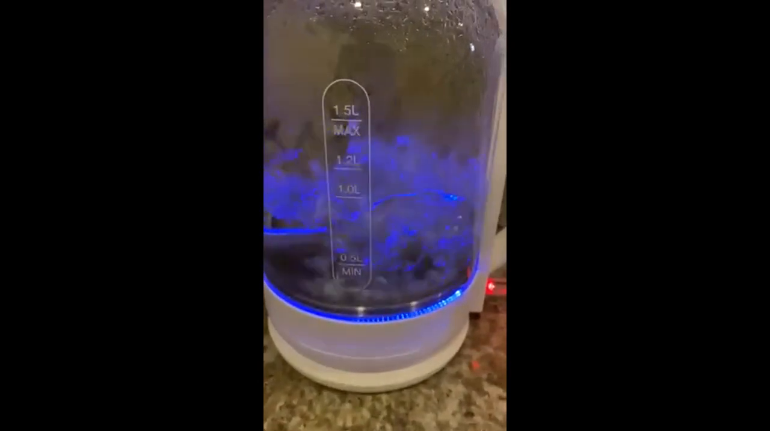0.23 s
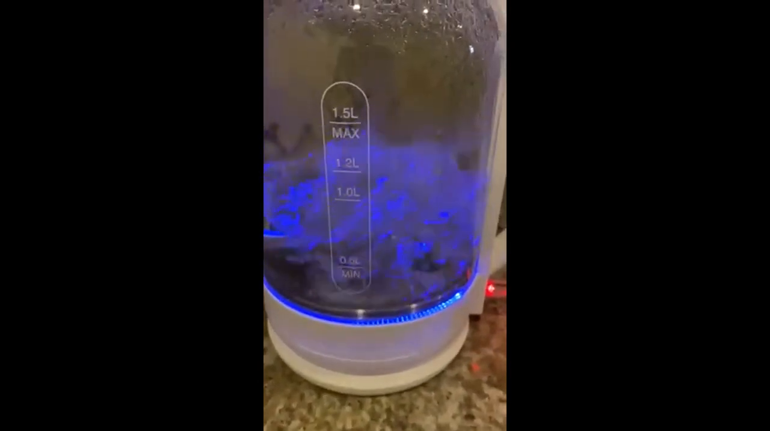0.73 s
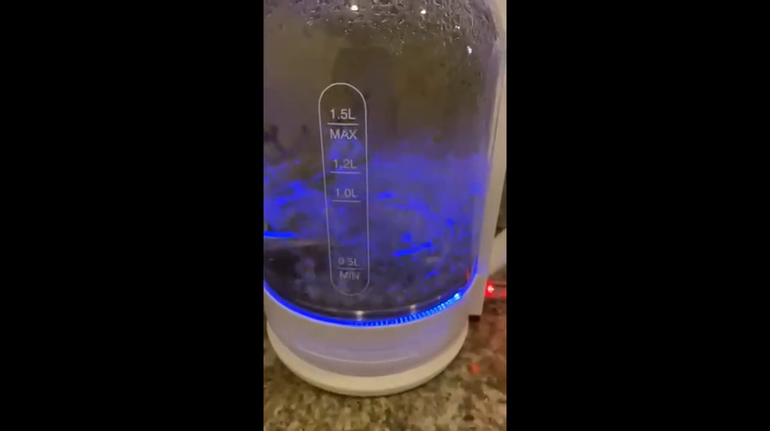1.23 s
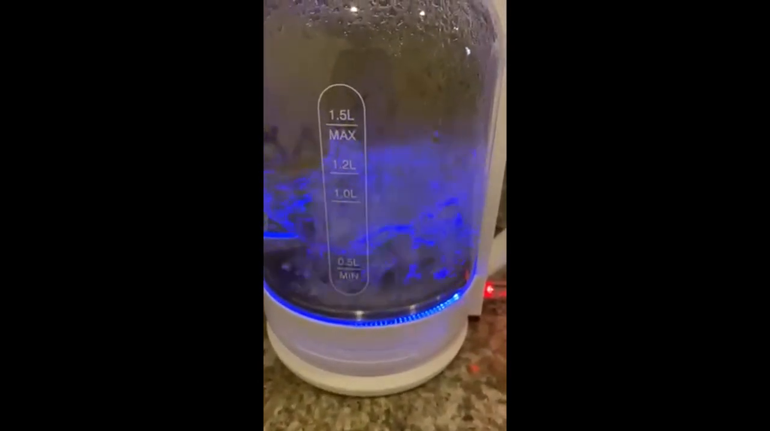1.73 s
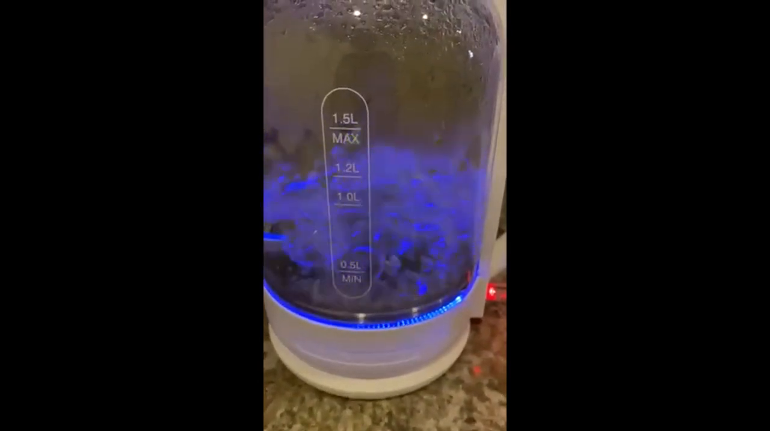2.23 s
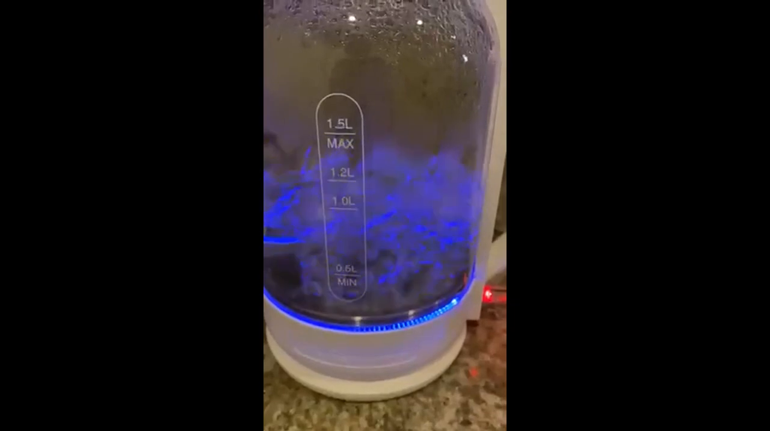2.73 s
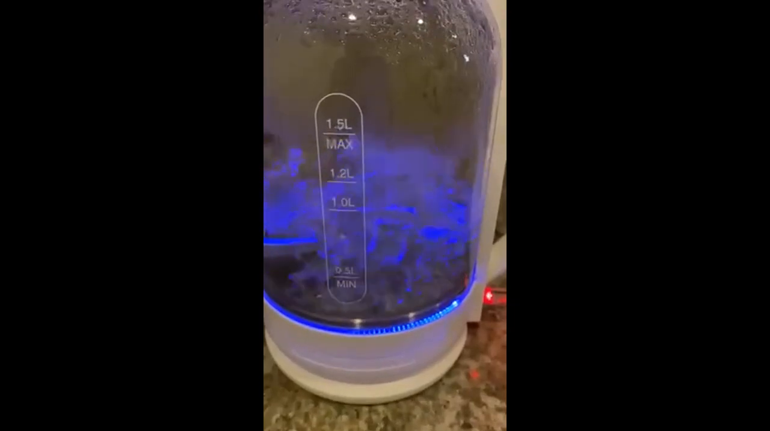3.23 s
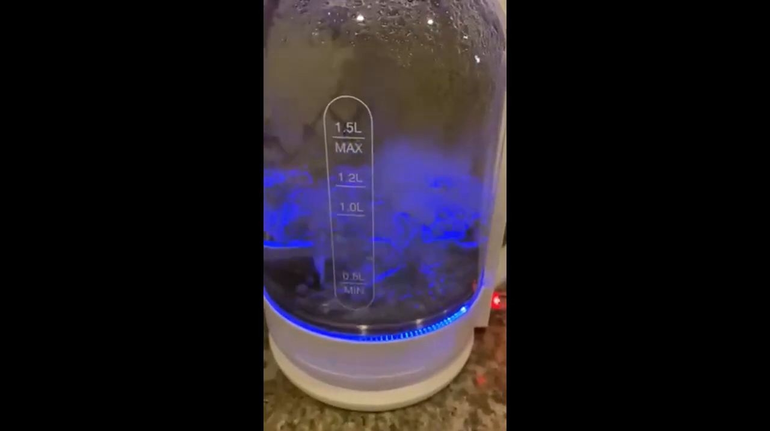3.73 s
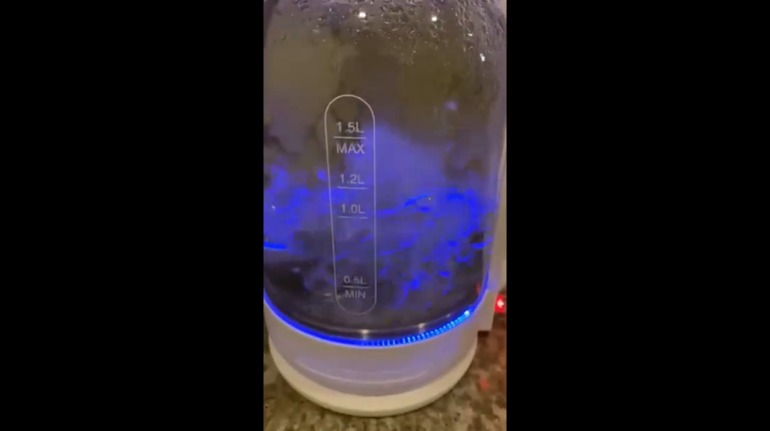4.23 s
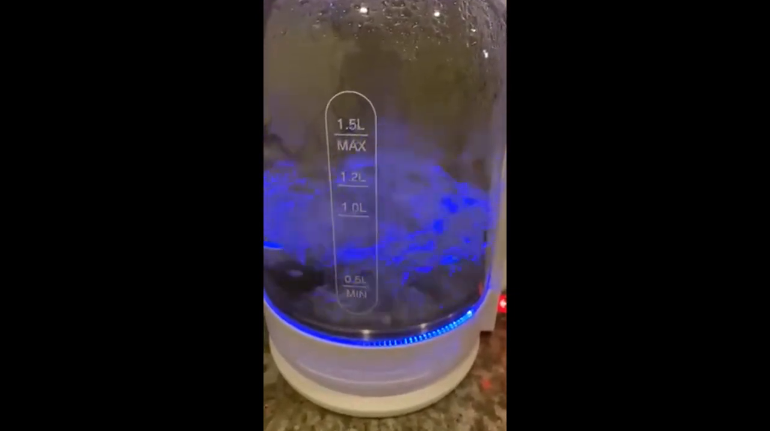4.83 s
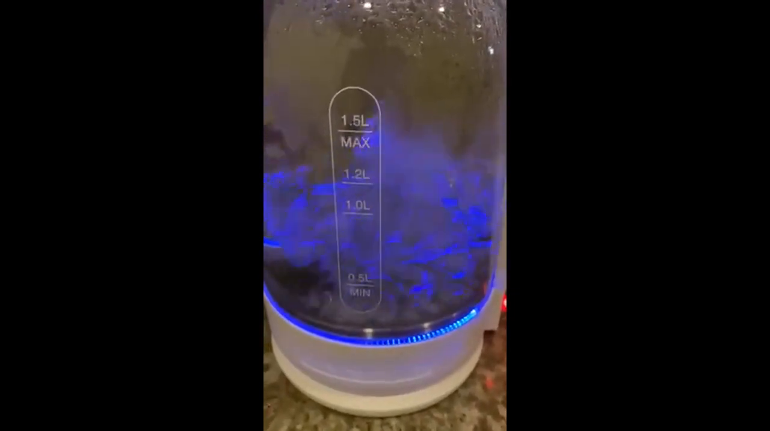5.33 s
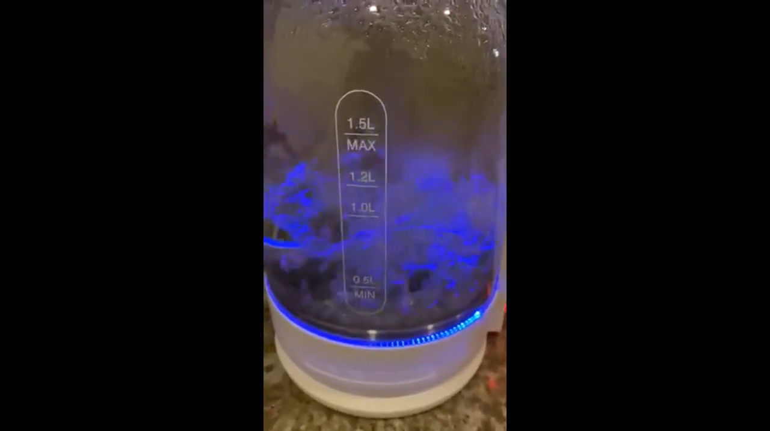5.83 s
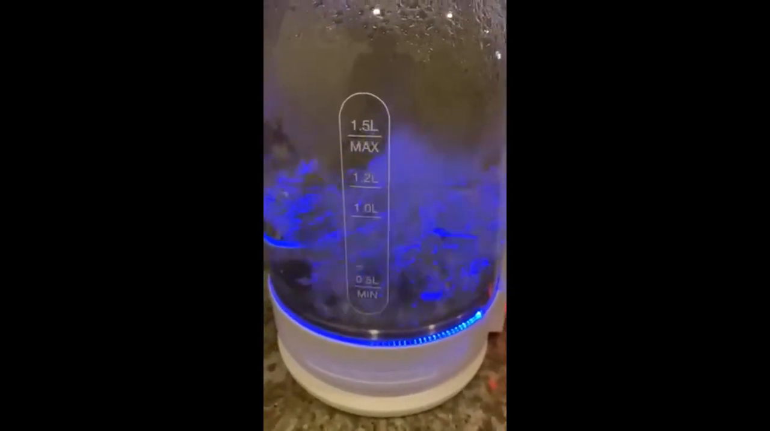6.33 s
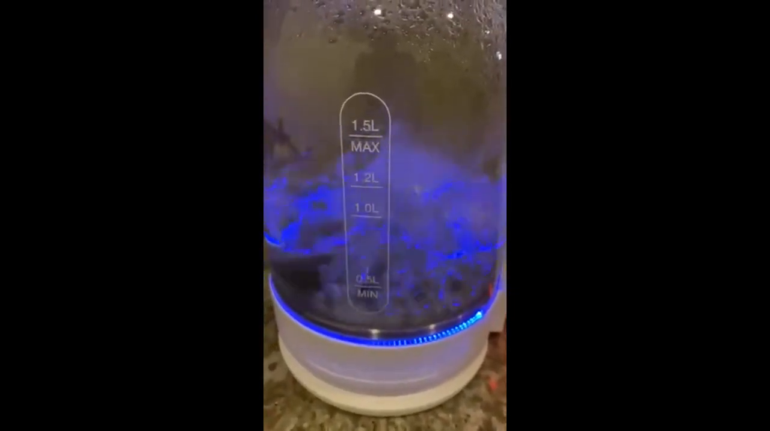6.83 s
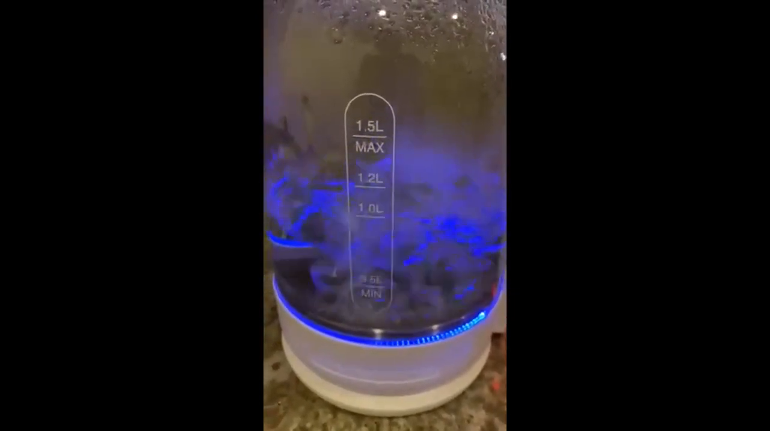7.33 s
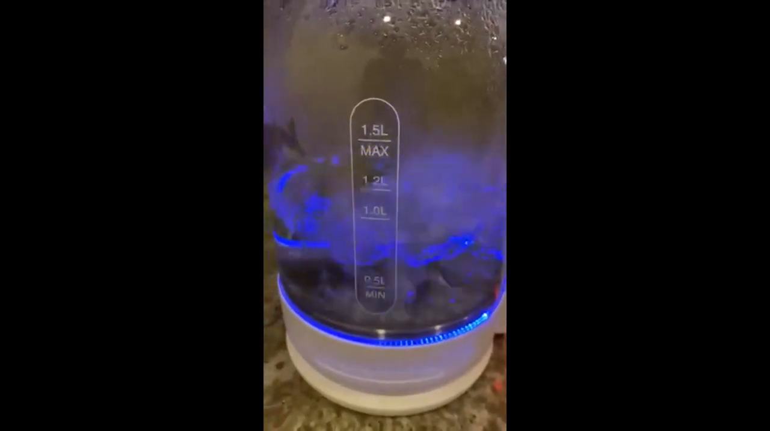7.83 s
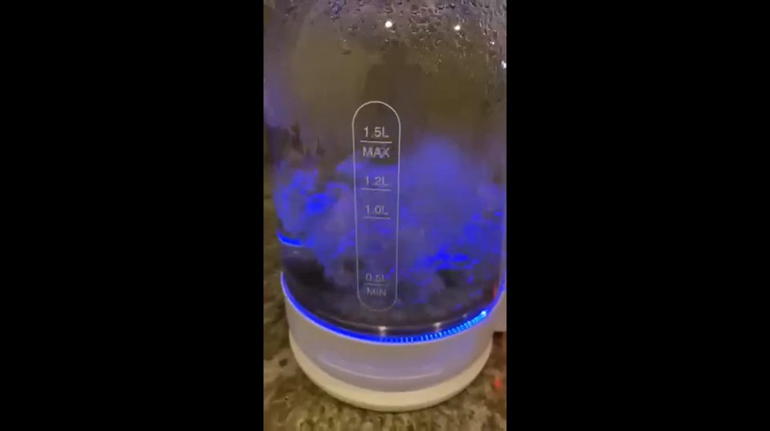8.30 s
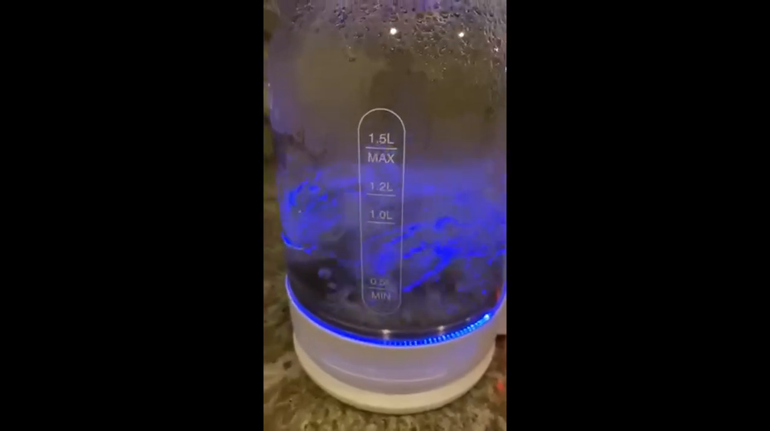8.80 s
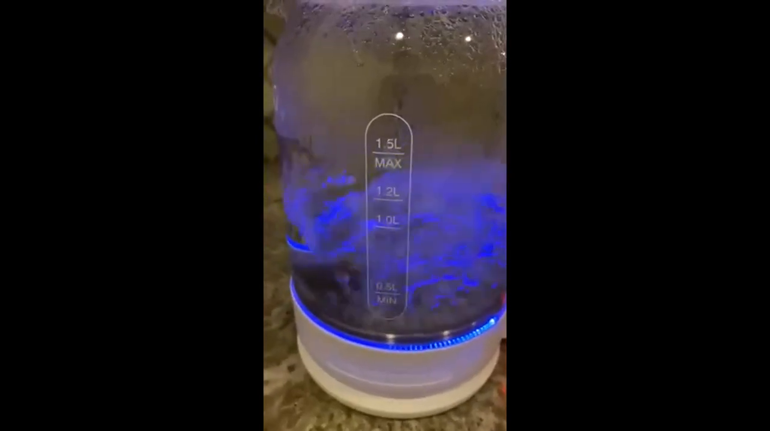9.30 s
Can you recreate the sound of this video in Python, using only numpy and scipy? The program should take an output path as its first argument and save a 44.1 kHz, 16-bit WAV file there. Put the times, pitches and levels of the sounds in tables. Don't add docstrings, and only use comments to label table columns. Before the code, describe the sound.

From 0 seconds water is already at a full rolling boil in a glass kettle on a stone worktop, and it continues without pause for about nine and a half seconds. The foundation is a deep, lumpy rumble, mostly between 100 and 500 hertz, made of crowded steam-pocket thumps with bigger individual bursts poking out every few tenths of a second. Over it, small bubbles gurgle around one kilohertz, with clear plops and higher blips. A much quieter, patchy spray hiss carries dry ticks, brief glassy pings and small splashes. Heavy gulps cluster around 4.4 to 4.8 seconds; the boil swells near 6.9 to 7.1, and wetter splashes stand out at about 7.5, 8.1 and 8.8. It stops abruptly, still boiling. Close stereo phone pickup, right side heavier in bass, highs softly limited, little room sound.

```python
import sys
import numpy as np
from scipy import signal
from scipy.fft import rfft, irfft, next_fast_len
from scipy.io import wavfile
from scipy.ndimage import uniform_filter1d, map_coordinates

SR = 44100
rng = np.random.default_rng(int(sys.argv[2]) if len(sys.argv) > 2 else 0)


def dump(signal):
    limited = np.clip(np.atleast_2d(signal).T, -1, 1)
    pcm = np.round(limited * 32767).astype(np.int16)
    wavfile.write(sys.argv[1], SR, pcm)


def volts_from_decibels(level):
    exponent = np.asarray(level, float) / 20
    return 10 ** exponent


N = 421596


def unit(x):
    return x / np.sqrt(np.mean(x ** 2) + 1e-20)


def along(points, hz):
    f, v = np.transpose(points)
    return np.interp(np.log(hz + 1), np.log(f + 1), v)


def wobble(rate_hz):
    knots = rng.standard_normal(int(N * rate_hz / SR) + 4)
    return map_coordinates(knots, [np.arange(N) * rate_hz / SR])


def filtered(x, response):
    m = next_fast_len(N + SR // 4)
    return irfft(rfft(x, m) * response(np.fft.rfftfreq(m, 1 / SR)), m)[..., :N]


def flat(x):
    own = uniform_filter1d(np.mean(np.abs(rfft(x)) ** 2, 0), size=600) ** .5
    return unit(irfft(rfft(x) / np.maximum(own, own.max() / 30), N))


def patchy(x, depth_db):
    z = signal.stft(x, nperseg=256)[2]
    field = uniform_filter1d(rng.standard_normal(z.shape[1:]), size=5, axis=0)
    field = uniform_filter1d(field, size=9, axis=1)
    return signal.istft(z * volts_from_decibels(depth_db * unit(field)), nperseg=256)[1][:, :N]


# (frequency [Hz], width [Hz], lift [dB])
WATER_MODES = [(168, 20, 7), (246, 24, 7), (314, 30, 5), (355, 24, 4), (400, 20, 4), (485, 40, 3),
               (670, 30, 3), (865, 40, 4), (1000, 50, 4), (1117, 40, 7), (2145, 80, 4), (2285, 70, 5),
               (2500, 80, 6), (3084, 60, 5)]
# (frequency [Hz], width [Hz], lift [dB])
GLASS_MODES = [(4400, 90, 4), (4670, 80, 4), (5010, 80, 5), (5500, 90, 3), (6014, 60, 9), (7050, 120, 3),
               (7472, 110, 6), (7900, 100, 4), (8518, 110, 6), (9200, 120, 5), (9800, 120, 4),
               (11200, 300, 3), (13100, 400, 4)]


def vessel(hz):
    total = 1
    for centre, width, lift_db in WATER_MODES + GLASS_MODES:
        band = 1j * hz * width
        total = total + (volts_from_decibels(lift_db) - 1) * band / (centre * centre - hz * hz + band)
    return total


def coloured(x, spectrum):
    return unit(filtered(x, lambda hz: volts_from_decibels(along(spectrum, hz)) * vessel(hz)))


# (time [s], level [dB])
BOIL_VIGOUR = [(0.0, -48), (0.05, -40), (1.04, -38), (4.37, -39.5), (4.74, -37.5), (4.9, -40.5),
               (6.23, -36), (6.31, -40.5), (6.87, -37), (7.0, -33.5), (7.06, -38), (9.4, -39.5),
               (9.53, -40.5), (9.56, -33)]


def level(db, follows):
    s, vigour_db = np.transpose(BOIL_VIGOUR)
    return volts_from_decibels(db + follows * np.interp(np.arange(N) / SR, s, vigour_db - vigour_db.mean()))


def bubbles(s, gain, hz, life_s, rise, swell, size):
    gain, hz, life_s = np.float32([gain, hz, life_s])
    u = np.arange(size, dtype=np.float32) / SR / life_s[:, None] - swell
    shape = np.exp(-np.where(u < 0, (2 * u / swell) ** 2, u - 1 + np.exp(-np.abs(u))))
    cycles = (hz * life_s)[:, None] * (u + rise * u ** 2 / 2)
    wave = gain[:, None] * shape * np.cos(2 * np.pi * cycles)
    at = ((s - swell * life_s) * SR).astype(int)[:, None] + np.arange(size)
    at = np.where(at < 0, N, np.minimum(at, N))
    return np.bincount(at.ravel(), wave.ravel(), N + 1)[:N]


def swarm(count, hz, octaves, cycles, spread_db, bed_db, rise, swell, size):
    pair = []
    for _ in range(2):
        when, pitch = rng.random(count), rng.uniform(-1.004, 1, count)
        big = rng.exponential(size=count)
        f = hz * 2 ** (octaves * pitch)
        gain = volts_from_decibels(spread_db * np.minimum(big, 3.5))
        pair.append(bubbles(when * N / SR, gain, f, cycles / f, rise, swell, size))
    return flat(np.array(pair)) + volts_from_decibels(bed_db) * rng.standard_normal((2, N))


def lifted(table, lift_db):
    return [(s, db + lift_db, hz) for s, db, hz in table]


def puffs(s, db, decay_s, rise_s):
    t, out = np.arange(SR // 8) / SR, np.zeros(N + SR)
    for at, peak_db, fall_s in np.broadcast(s, db, decay_s):
        shape = (1 - np.exp(-t / rise_s)) * np.exp(-t / max(fall_s, .001))
        out[round(at * SR):][:len(t)] += volts_from_decibels(peak_db) * shape
    return out[:N]


def echoed(x):
    echo_db, t60_s, rise_s = -2.5, 0.06, 0.0046
    t = np.arange(SR // 10) / SR
    tail = rng.standard_normal((2, len(t))) * volts_from_decibels(-60 * t / t60_s) * (1 - np.exp(-t / rise_s))
    tail = tail / np.linalg.norm(tail[0])
    return x * [[1], [0]] + volts_from_decibels(echo_db) * signal.oaconvolve(x[None], tail, axes=1)[:, :N]


# (frequency [Hz], level [dB])
HEAVE_SPECTRUM = [(18, -49), (32, -20), (48, -8), (60, -3), (100, 0.5), (140, 1.5), (200, -17.5),
                  (300, -43.5)]


def heave():
    rumble = coloured(rng.standard_normal((2, N)), HEAVE_SPECTRUM)
    return level(db=-44, follows=0.14) * volts_from_decibels(4 + 0.36 * wobble(2.0)) * rumble


# (frequency [Hz], level [dB])
THUMP_SPECTRUM = [(70, -37), (120, -18), (170, -2.5), (280, -7), (400, -7), (440, -13), (510, -13.5),
                  (580, -16.5), (790, -21), (1200, -48.5)]


def thumps():
    crowd = swarm(count=3200, hz=270.6, octaves=1.63, cycles=0.66, spread_db=1.5, bed_db=4.0,
                  rise=0.053, swell=1.81, size=1800)
    return level(db=-38, follows=0.63) * volts_from_decibels(5.5 + 0.39 * wobble(10)) * coloured(crowd, THUMP_SPECTRUM)


# (frequency [Hz], level [dB])
GURGLE_SPECTRUM = [(350, -7.5), (500, 1.5), (720, -9), (900, -4.5), (1100, 0), (1300, -9), (1800, -15.5),
                   (2400, -12.5), (2800, -22.5), (3600, -76), (5000, -65)]


def gurgle():
    crowd = swarm(count=9000, hz=1259.0, octaves=1.7, cycles=3, spread_db=1.5, bed_db=6.0,
                  rise=0.043, swell=1.0, size=600)
    return level(db=-47.5, follows=0.057) * volts_from_decibels(4.5 + 0.14 * wobble(11)) * coloured(crowd, GURGLE_SPECTRUM)


# (frequency [Hz], level [dB])
SPRAY_SPECTRUM = [(1500, -50), (2800, -5), (3600, -5.5), (4300, -4.5), (5000, -3.5), (6250, -10),
                  (6600, -3), (7300, -1), (8300, -6), (9600, -4.5), (10500, -9), (11400, -8.5),
                  (12300, -16), (13100, -15), (13800, -19.5), (15000, -16.5), (15700, -25)]


def fizz():
    crowd = swarm(count=20000, hz=6560, octaves=1.3, cycles=8.9, spread_db=1.5, bed_db=1.0,
                  rise=0.0088, swell=0.54, size=300)
    lumps = volts_from_decibels(5.5 + 0.25 * wobble(12) + 0.46 * wobble(22) + 1.0 * wobble(70))
    hiss = coloured(patchy(crowd, depth_db=2.0), SPRAY_SPECTRUM)
    return level(db=-60, follows=0.063) * lumps * hiss


# (time [s], peak level [dB], pitch [Hz])
PLOPS = [(0.08, -27.5, 1026), (1.024, -28.5, 1070), (6.315, -34, 937), (1.607, -32, 1090),
         (2.43, -31, 1110), (2.471, -31, 1050), (3.061, -33, 970), (4.62, -32, 934), (5.192, -29.5, 1070),
         (5.862, -30, 1140), (6.548, -35.5, 916), (6.982, -31.5, 1063), (7.074, -40, 1100),
         (7.643, -32, 1080), (8.339, -31, 1044)]
# (time [s], peak level [dB], pitch [Hz])
BLIPS = [(0.9177, -37.5, 2620), (0.919, -48, 3020), (1.792, -34.5, 2610), (1.792, -36, 3080),
         (2.0911, -39, 2050), (2.203, -38, 3060), (3.561, -44, 2550), (3.9762, -32, 2390),
         (4.9395, -37.5, 2450), (5.028, -40, 3000), (5.327, -39, 2140), (5.7376, -38, 2520),
         (6.568, -36.5, 2630), (6.569, -38, 3090), (7.154, -43, 4300), (7.2035, -41, 2140),
         (7.395, -38.5, 2620), (9.331, -44, 3100), (9.3325, -36, 2530), (9.5327, -38, 2150)]
# (time [s], peak level [dB], pitch [Hz])
GLUGS = [(0.0163, -40, 1126), (0.223, -51, 1110), (0.7253, -51, 990), (1.2555, -41.5, 1110),
         (1.3284, -43, 1060), (1.721, -38, 1070), (1.9654, -42.5, 990), (2.2944, -38, 1018),
         (2.3271, -39, 970), (2.835, -42, 1110), (3.7993, -44, 1040), (3.8706, -44, 895),
         (3.9783, -38.5, 1053), (4.4214, -42, 1130), (4.5132, -41, 950), (4.669, -44, 1094),
         (4.7563, -39, 1050), (4.9457, -46, 1070), (5.0464, -38, 1087), (5.3152, -37, 1030),
         (5.5897, -41, 1000), (5.7593, -52, 1100), (5.9933, -41, 1024), (6.157, -41, 1120),
         (7.02, -43.5, 990), (7.4587, -54, 980), (7.5892, -42.5, 985), (7.9162, -49, 1090),
         (8.0088, -46, 1060), (8.1858, -41.5, 956)]
# (time [s], peak level [dB], pitch [Hz])
BEADS = [(0.244, -41, 2290), (0.464, -42, 1360), (0.841, -44, 2400), (1.1518, -41, 1350),
         (1.5575, -43, 2280), (1.7749, -50, 2480), (2.4553, -39, 1330), (2.7447, -43, 2220),
         (3.454, -45, 2400), (3.8985, -44, 1410), (4.0567, -44, 1350), (4.2228, -40, 2270),
         (4.2687, -43.5, 1350), (4.5027, -42.5, 2020), (4.5236, -48, 1410), (5.1861, -45, 2270),
         (5.256, -45, 2340), (5.8626, -42, 1460), (6.0297, -47.5, 1500), (6.121, -40, 2180),
         (6.3989, -42, 1390), (7.5323, -43, 2470), (7.619, -43.5, 1390), (7.8655, -46, 2490),
         (8.078, -45, 2300), (8.4497, -45.5, 1400), (8.7725, -46, 2060), (9.3741, -45, 2390)]


def clear_bubbles():
    s, db, hz = np.transpose(PLOPS + BLIPS + lifted(GLUGS, 6.5) + lifted(BEADS, 1.5))
    life_s = 4.73 / hz
    return echoed(bubbles(s + 0.384 * life_s, volts_from_decibels(db - 2.5), hz, life_s, rise=0.019, swell=0.28, size=2600))


# (time [s], peak level [dB])
SPITS = [
    (0.037, -48),
    (4.188, -50),
    (7.526, -51),
    (8.67, -49),
    (0.694, -63),
    (1.568, -64),
    (5.41, -62),
    (7.257, -64),
    (7.33, -60),
    (9.336, -62),
]
# (frequency [Hz], level [dB])
SPIT_SPECTRUM = [(7000, -40), (8000, 0), (9500, -2), (13000, -5), (14500, -40)]


def spits():
    s, db = np.transpose(SPITS)
    noise = unit(filtered(rng.standard_normal(N), lambda hz: volts_from_decibels(along(SPIT_SPECTRUM, hz))))
    return puffs(s, db, decay_s=0.0046, rise_s=0.0022) * noise


# (time [s], peak level [dB])
TICKS = [(0.0373, -46), (0.4838, -42.5), (0.579, -44), (0.84, -48), (0.9168, -45.5), (1.2321, -43),
         (1.2622, -44), (1.4702, -44), (1.5687, -41.5), (1.7913, -44.5), (2.0744, -39.5), (2.205, -37.5),
         (2.388, -43), (2.5155, -44.5), (2.7162, -45.5), (3.2074, -38.5), (3.264, -46), (4.1764, -43.5),
         (4.1924, -43), (4.503, -46), (4.524, -37), (4.6333, -46.5), (4.682, -49), (4.6952, -44.5),
         (5.0295, -44), (5.0739, -52), (5.466, -36), (6.349, -38), (6.567, -41.5), (7.1544, -40.5),
         (7.2337, -43), (7.2577, -43.5), (7.3143, -44), (7.5292, -48), (7.8062, -40.5), (7.8364, -45.5),
         (8.0097, -48), (8.0752, -37.5), (8.4898, -45), (8.6273, -44), (8.6712, -39), (8.7212, -46.5),
         (8.78, -38), (8.8922, -36.5), (9.3312, -37.5)]
# (frequency [Hz], level [dB])
TICK_SPECTRUM = [(1800, -34.5), (2800, -5), (4500, 0), (7000, -2.5), (10000, -9), (14000, -13),
                 (16000, -30)]


def ticks():
    s, db = np.transpose(TICKS)
    cracks = puffs(s, db - 4, decay_s=.003, rise_s=.001)
    return echoed(cracks * coloured(rng.standard_normal(N), TICK_SPECTRUM))


# (time [s], peak level [dB], pitch [Hz])
PINGS = [(0.0388, -52, 4370), (0.4838, -47, 4370), (0.5796, -41, 4730), (0.693, -40, 5990),
         (0.841, -48, 4240), (1.1603, -51, 4370), (1.2321, -49, 4670), (1.2625, -46, 4260),
         (1.4696, -43, 4240), (1.57, -41, 5860), (2.074, -39, 5800), (2.388, -51, 4470),
         (2.5162, -48, 3870), (2.7162, -52, 4230), (2.9976, -50, 4300), (3.2075, -39, 6020),
         (3.2645, -45, 3580), (3.7055, -41, 5350), (4.0352, -47, 4700), (4.1565, -55, 4330),
         (4.1924, -43, 5900), (4.3615, -40, 5990), (4.4348, -40, 7230), (4.5032, -51, 4470),
         (4.5246, -43, 4480), (4.5491, -44, 4430), (4.6339, -42, 5880), (4.6952, -41, 5300),
         (4.9033, -40.5, 5500), (5.031, -43, 6100), (5.0739, -40, 6020), (5.246, -41, 5670),
         (5.439, -40, 7220), (5.466, -38, 5240), (5.689, -43, 4580), (5.8706, -50, 5960),
         (6.0287, -44, 4410), (6.348, -45, 4240), (6.4602, -42, 5980), (6.573, -40, 5940),
         (7.1546, -45, 4300), (7.235, -40, 4500), (7.2584, -41, 4400), (7.3143, -40, 6000),
         (7.4914, -43, 5430), (7.5288, -45, 4160), (7.7503, -41, 6030), (7.806, -41, 5370),
         (7.8351, -43, 4250), (8.0097, -43, 5400), (8.0765, -45, 4200), (8.2556, -48, 4340),
         (8.4886, -40, 6690), (8.6273, -43, 4230), (8.6712, -38, 5800), (8.7201, -47, 4300),
         (8.78, -41, 4240), (8.8926, -41, 5900), (9.103, -39, 6000), (9.3317, -56, 4350)]


def pings():
    s, db, hz = np.transpose(PINGS)
    life_s = 8.7 / hz
    return echoed(bubbles(s + 0.000995, volts_from_decibels(db - 3.5), hz, life_s, rise=0.0032, swell=0.38, size=1200))


# (time [s], peak level [dB])
SPLASHES = [(0.039, -46.5), (0.4838, -47), (8.78, -36), (0.694, -40.5), (1.1603, -43.5), (1.262, -44),
            (1.47, -44), (1.568, -37.5), (2.0742, -48), (2.388, -50), (3.205, -34.5), (3.265, -47),
            (4.1924, -40), (4.3615, -40.5), (4.503, -34), (4.695, -53), (4.953, -36), (5.03, -43),
            (5.072, -45), (5.465, -39), (5.69, -42), (5.8694, -36.5), (6.5725, -45), (7.1546, -35),
            (7.2562, -33), (7.5268, -31), (8.0768, -30), (8.673, -33), (8.0097, -43), (9.335, -39)]


def splashes():
    drips, drip_db, drip_spread_db = 12, -35.5, -1
    decay_s, sharper_per_db = 0.0096, 0.37
    dull_hz = 14300
    when, big = rng.random((drips, 2)).T
    s, db = np.transpose(SPLASHES)
    smacks = puffs(s, db - 4.5, decay_s=0.0047, rise_s=0.0006)
    s = np.r_[s, when * N / SR]
    db = np.r_[db, drip_db + drip_spread_db * (2 * big - 1)]
    envelope = smacks + puffs(s, db - 7.0, decay_s * np.exp(-sharper_per_db * (db + 42)), rise_s=0.0036)
    sheets = coloured(patchy(rng.standard_normal((2, N)), depth_db=7.5), SPRAY_SPECTRUM) * envelope
    return filtered(sheets, lambda hz: 1 / (1 + (hz / dull_hz) ** 4))


# (time [s], peak level [dB], pitch [Hz])
BURSTS = [(0.179, -24, 231), (0.277, -20, 242), (0.554, -19, 300), (0.832, -14, 338), (1.376, -22, 205),
          (1.877, -31, 247), (2.809, -24, 166), (2.986, -25, 240), (3.043, -17, 164), (3.998, -16, 216),
          (4.365, -20, 255), (4.517, -14, 281), (4.599, -21, 170), (4.714, -20.5, 194), (4.809, -14, 343),
          (5.129, -18.5, 163), (2.417, -17, 373), (5.997, -17.5, 224), (6.111, -21.5, 241),
          (6.504, -21, 241), (6.764, -15, 240), (7.336, -16, 247), (7.422, -16, 253), (7.617, -12.5, 387),
          (7.725, -15, 352), (7.964, -19, 229), (8.339, -24.5, 228), (8.769, -23, 166), (9.096, -13.5, 365),
          (9.25, -16.5, 252)]
# (time [s], peak level [dB], pitch [Hz])
GULPS = [(0.079, -17.5, 374), (0.768, -19.5, 171), (0.765, -28, 560), (1.645, -18.5, 557),
         (1.714, -20, 171), (2.298, -17, 430), (2.379, -16, 503), (2.467, -21, 169), (2.62, -24.5, 237),
         (3.071, -15.5, 430), (3.283, -17, 342), (3.546, -20, 175), (4.196, -18, 350), (5.199, -29, 173),
         (5.607, -20.5, 168), (5.875, -14.5, 340), (5.938, -21, 540), (6.498, -16, 384),
         (6.856, -16.5, 370), (6.905, -13, 230), (6.978, -17.5, 172), (7.349, -15.5, 348),
         (7.824, -18, 290), (8.291, -20, 238), (8.367, -17, 350), (8.736, -27, 178), (9.144, -17.5, 172),
         (9.508, -18, 179), (9.527, -23.5, 240)]
# (time [s], peak level [dB], pitch [Hz])
POPS = [(0.382, -28, 347), (0.447, -32, 338), (0.803, -46, 390), (1.208, -30.5, 310), (1.438, -29.5, 330),
        (2.005, -39, 350), (2.357, -33, 410), (2.874, -27, 385), (2.97, -31, 348), (3.496, -24, 370),
        (3.898, -39, 335), (4.033, -35, 361), (4.237, -34.5, 312), (4.435, -37, 407), (5.071, -52, 318),
        (6.287, -49, 345), (6.401, -37, 344), (6.654, -39, 357), (6.708, -33, 327), (6.784, -29.5, 323),
        (6.926, -32, 275), (6.989, -31, 295), (7.401, -26.5, 305), (7.911, -30.5, 326), (8.423, -32.5, 330),
        (8.609, -44, 343), (8.719, -27.5, 372), (8.929, -31, 322), (9.165, -30.5, 329), (9.423, -31, 357)]
# (time [s], peak level [dB], pitch [Hz])
BLOBS = [(0.666, -27, 500), (1.605, -40, 444), (1.826, -44, 520), (2.214, -28, 484), (3.043, -41, 474),
         (3.578, -41, 468), (3.912, -36, 484), (3.938, -42, 484), (5.303, -28, 460), (6.548, -35, 484),
         (6.933, -39, 450), (7.215, -30, 474), (7.242, -37, 458), (8.18, -42, 439), (8.772, -51, 445),
         (9.512, -53, 517)]


def pockets():
    s, db, hz = np.transpose(BURSTS + GULPS + lifted(POPS, 9.5) + lifted(BLOBS, 10.5))
    life_s = 1.34 / hz
    big = bubbles(s + 0.00457, volts_from_decibels(db - 5.5), hz, life_s, rise=0.018, swell=0.93, size=2400)
    return big * [[1], [0]]


# (frequency [Hz], level [dB])
LEFT_SHADE = [(60, 0), (100, -3), (170, -17), (240, -17), (280, -7), (330, -19), (400, -7), (500, -5.5),
              (580, -1.5), (1000, 0), (1120, -3.5), (1300, 0), (3300, 0), (3800, -3), (4300, -1), (5500, 0)]
# (frequency [Hz], likeness [0-1])
LIKENESS = [(30, .7), (110, .92), (200, .7), (270, .35), (400, .87), (470, .75), (560, .92), (900, .84),
            (1000, .5), (1130, .88), (1500, .45), (2200, .62), (2500, .82), (2800, .3), (3800, .5),
            (4300, .8), (5000, .8), (6300, .45), (7200, .8), (7700, .93), (8200, .997), (12100, .997),
            (12600, .7), (13600, .4), (14300, .5), (15000, .55), (15700, .8)]
# (frequency [Hz], lead [rad])
LEFT_LEAD = [(20, 0), (220, -.5), (300, 2.2), (500, 2.8), (900, 2.4), (990, 1.6), (1120, 2.6), (1250, 2.2),
             (1600, .3), (2500, 1.5), (4200, .7), (5000, 1.7), (5600, 1.4), (6400, 2.3), (7500, 2.6),
             (8200, 3.14), (12200, 3.14), (13600, 3.6), (14300, 4.3), (15000, 5.6), (15500, 6.2)]


def ports(pair):
    def to_left(hz):
        like = np.clip(along(LIKENESS, hz), 0, 1)
        direct = like * np.exp(1j * along(LEFT_LEAD, hz))
        scattered = np.sqrt(1 - like ** 2)
        return volts_from_decibels(along(LEFT_SHADE, hz)) * [direct, scattered]

    return np.array([filtered(pair, to_left).sum(0), pair[0]])


def scene():
    surge_db = 1 * wobble(14)
    low = thumps() + pockets()
    high = gurgle() + fizz() + clear_bubbles() + ticks() + pings() + splashes()
    kettle = heave() + low * volts_from_decibels(0.57 * surge_db) + high * volts_from_decibels(surge_db - 0.94)
    return ports(kettle) + spits()


def top_cut(x):
    return signal.sosfilt(signal.butter(12, 15750, fs=SR, output="sos"), x)


def record(dry):
    fade_s, top_hz = .01, 15750
    fade = np.minimum(1, np.arange(N)[::-1] / SR / fade_s)
    mix = filtered(dry * fade, lambda hz: hz < top_hz)
    return top_cut(mix)


dry = scene()
out = record(dry)
dump(out)
```